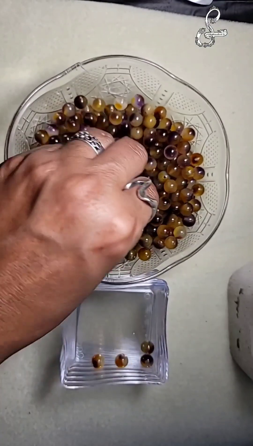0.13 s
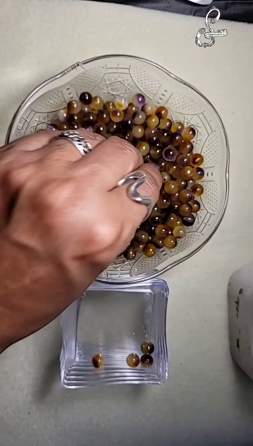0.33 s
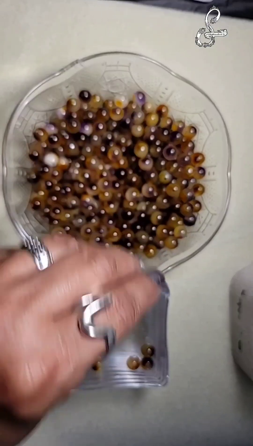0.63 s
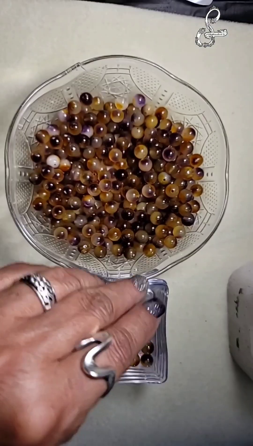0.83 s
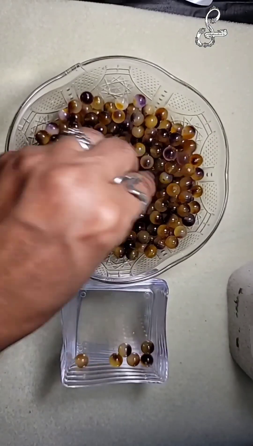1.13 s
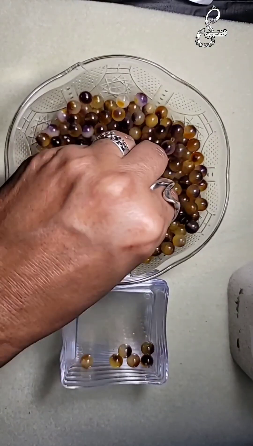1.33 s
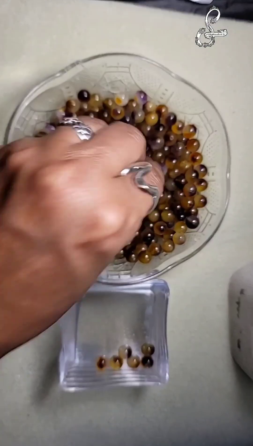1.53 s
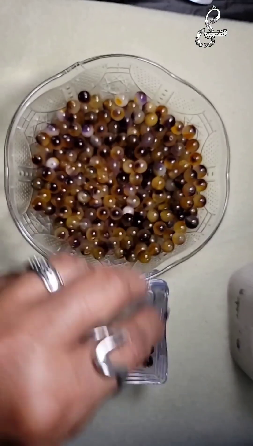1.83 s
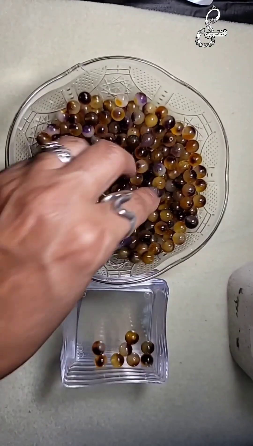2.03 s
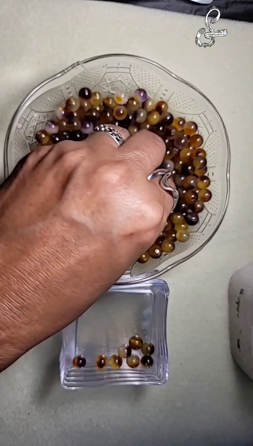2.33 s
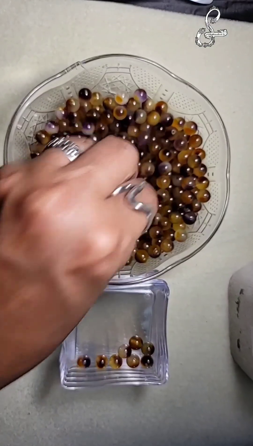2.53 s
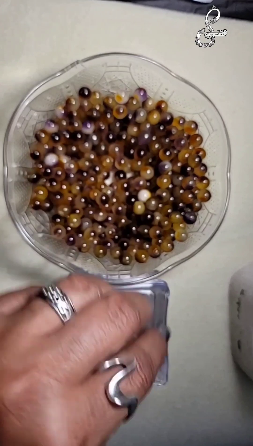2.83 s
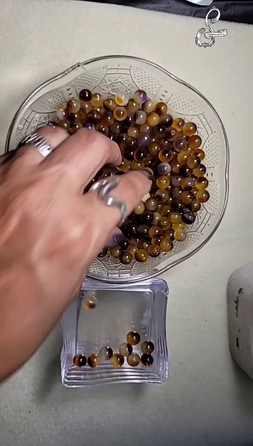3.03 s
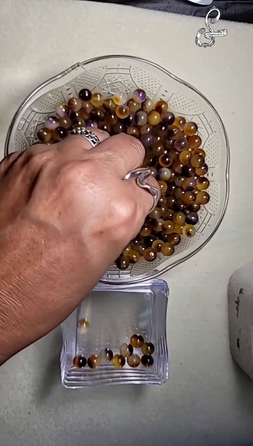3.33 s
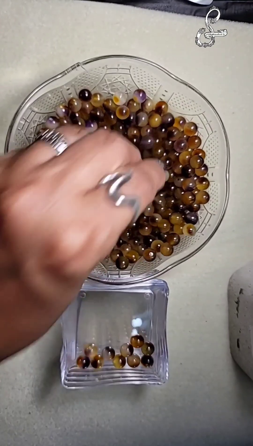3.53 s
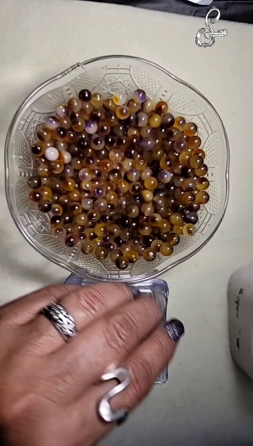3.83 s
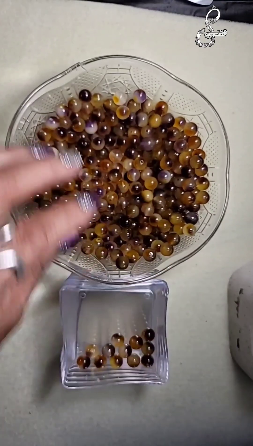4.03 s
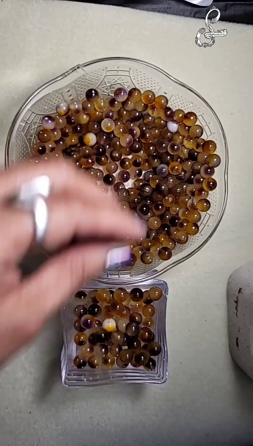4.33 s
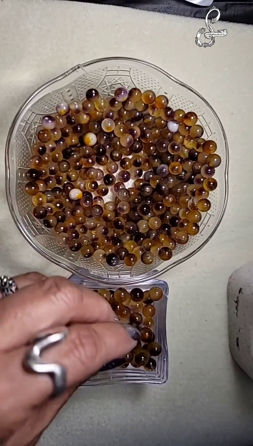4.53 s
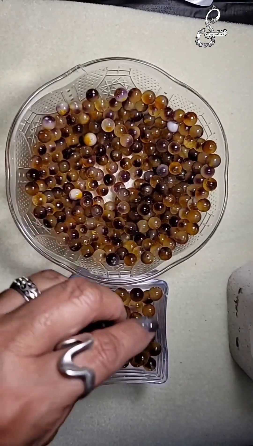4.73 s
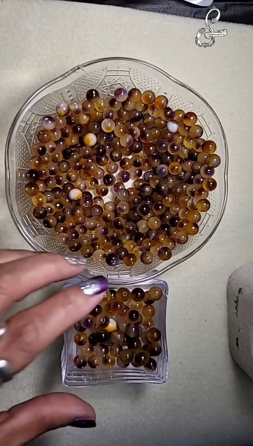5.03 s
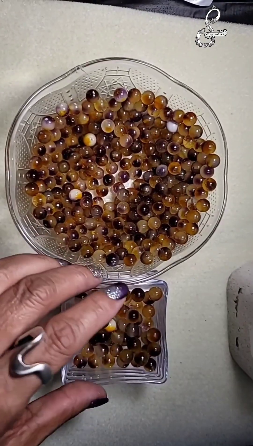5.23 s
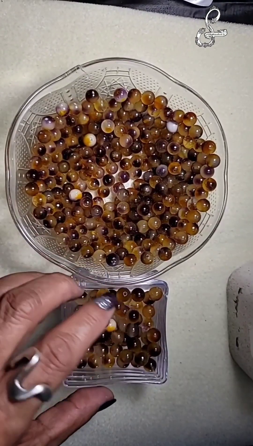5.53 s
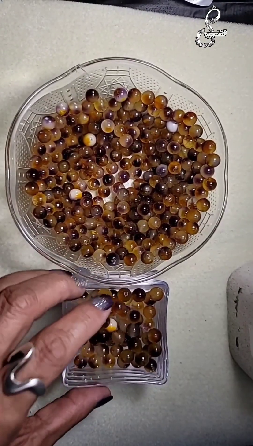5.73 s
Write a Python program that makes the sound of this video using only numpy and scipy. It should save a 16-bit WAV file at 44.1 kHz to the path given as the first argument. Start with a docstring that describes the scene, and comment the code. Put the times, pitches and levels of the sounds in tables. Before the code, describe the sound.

Close stereo sound in a small room with a faint low appliance hum and soft air. A hand digs into stone beads in a glass bowl with dense dry clatter, then drops a few into a clear plastic box with bright bouncing clicks. This repeats four times, about once a second; the sound then cuts out briefly, fades back, and a few dry clicks of the filled box end it.

```python
"""A low wavering hum over soft rushing air, and at once the dry clacks of small stone beads dug by hand in a glass bowl.
Filtered noise and sines make the hum; noise cracks, short knocks and damped glass modes make the bowl.
Picked beads drop, over and over, into a clear plastic box: each landing and bounce cracks and briefly rings its walls.
Fingers rub in dense noise grains, and later jostle the filled box in dry clicks; a small room answers the beads.
Near the end of the digging and dropping the sound drops out for a moment, then fades back in."""
import sys
import numpy as np
from scipy import signal
from scipy.fft import rfft, irfft, next_fast_len
from scipy.io import wavfile
from scipy.ndimage import map_coordinates

SR = 44100
rng = np.random.default_rng(int(sys.argv[2]) if len(sys.argv) > 2 else 0)


def wav_out(sig):
    """Save sig, one row per channel (or a flat mono array), as 16-bit PCM at SR to the path in sys.argv[1]."""
    wavfile.write(sys.argv[1], SR, np.round(np.clip(np.atleast_2d(sig).T, -1, 1) * 32767).astype(np.int16))


N = 259749  # length in samples


def amp(db):
    """Decibel law: amplitude ratio of a level in dB."""
    return 10 ** (np.asarray(db) / 20)


def unit(x):
    """Normalisation to a root-mean-square value of one."""
    return x / np.sqrt(np.mean(x ** 2) + 1e-20)


def along(points, hz):
    """Interpolation of (f/Hz, value) points on a logarithmic frequency axis."""
    f, value = np.transpose(points)
    return np.interp(np.log(hz + 1), np.log(f + 1), value)


def pan(db):
    """Interaural level difference: left and right gains for left minus right in dB."""
    return amp(np.array([db / 2, -db / 2]).reshape(2, -1))


def wobble(rate):
    """Band-limited fluctuation: a smooth random curve through rate knots a second."""
    knots = rng.standard_normal(int(N * rate / SR) + 4)
    return map_coordinates(knots, [np.arange(N) * rate / SR])


def filtered(x, response):
    """Linear filtering: the spectrum of x times a response of frequency."""
    size = next_fast_len(N + SR // 2)
    hz = np.fft.rfftfreq(size, 1 / SR)
    return irfft(rfft(x, size) * response(hz), size)[..., :N]


def convolve(x, tail):
    """Superposition: x sounded through an impulse response."""
    return signal.fftconvolve(np.atleast_2d(x), np.atleast_2d(tail), axes=1)[:, :N]


def colour(x, points, size=2048):
    """Minimum-phase filtering: a causal filter, folded in the cepstrum, with the given (f/Hz, level/dB) curve."""
    hz = np.fft.rfftfreq(size, 1 / SR)
    cepstrum = irfft(np.log(amp(along(points, hz))))
    cepstrum[1:size // 2] *= 2
    cepstrum[size // 2 + 1:] = 0
    return convolve(x, irfft(np.exp(rfft(cepstrum))))


def place(times, grains):
    """Superposition of events: one grain a row added in at its time."""
    index = np.round(times * SR).astype(int)[:, None] + np.arange(grains.shape[1])
    return np.bincount(index.ravel(), grains.ravel(), N)[:N]


def cracks(times, gains, t60, alike, size=700):
    """Impact noise: a brief decaying stereo burst for each contact, partly different at the two ears."""
    t = np.arange(size) / SR
    fade = gains[:, None] * amp(-60 * t / t60) * (1 - np.exp(-t / 0.0002))
    shared, left, right = rng.standard_normal((len(times), 3, size)).transpose(1, 0, 2)
    alike = np.clip(alike, 0, 1)
    sides = pan(2.7 * rng.standard_normal(len(times)))  # each contact radiates in its own direction
    bursts = np.sqrt(alike) * shared + np.sqrt(1 - alike) * np.array([left, right])
    return np.array([place(times, side[:, None] * fade * burst) for side, burst in zip(sides, bursts)])


def ring(modes, scatter_db=0, detune=0, size=4000):
    """Modal superposition: decaying cosines, optionally scattered in level and pitch, cut off after size samples."""
    t = np.arange(size) / SR
    out = 0
    for hz, db, t60, side in modes:
        phase = 2 * np.pi * hz * (1 + detune * rng.normal()) * t + np.pi * rng.integers(2)
        skew = np.array([[1], [-1]]) * rng.normal() * hz / 3500  # the two ears hear high modes out of step
        decay = amp(db + scatter_db * rng.normal() - 60 * t / t60)
        out = out + pan(side) * decay * np.cos(phase + skew)
    return out


def collisions(flow, rate, crowding, spread_db):
    """Inhomogeneous random process: contacts whose power follows flow, as more and stronger blows."""
    density = rate * (flow / flow.max()) ** np.clip(crowding, .3, 1.5)  # contacts per second
    at = np.flatnonzero(rng.random(N) < density / SR)
    sizes = amp(spread_db * np.clip(rng.standard_normal(len(at)), -2, 2))
    return at / SR, unit(sizes) * flow[at] / np.sqrt(density[at] / rate)


def swells(rows):
    """Gesture envelope: the gain rises, holds and falls along straight lines in dB."""
    SWELL_DB = 23  # height of the rise, and drop over each fall time
    t = np.arange(N) / SR
    out = 0
    for start, rise, hold, fall, db in rows:
        rising = np.maximum(1 - (t - start) / rise, 0)
        falling = np.maximum(t - start - rise - hold, 0) / fall
        out = out + (t >= start) * amp(db - SWELL_DB * (rising + falling))
    return out


# spectral density of the rushing air: (f/Hz, relative level/dB per Hz)
AIR_SPECTRUM = [(12, -46), (20, -38.5), (48, -1.5), (157, -9.5), (254, -12.5), (722, -26.5), (826, -29),
                (996, -27.5), (1270, -41.5), (1450, -32.5), (1570, -34), (2110, -38.5), (2680, -43),
                (6480, -52), (12000, -73), (15600, -106), (22000, -120)]
# left-right correlation of the air: (f/Hz, likeness from 0 to 1)
AIR_LIKENESS = [(60, 0.81), (150, 0.98), (300, 0.85), (800, 0.047), (3000, .1)]
# tones of the hum: (f/Hz, mean amplitude level/dB)
HUM_TONES = [(59.5, -38.5), (120, -47), (150.5, -47), (210, -62.5)]


def background():
    """Broadband flow noise with tones: an electric fan or similar appliance hums over low rushing air."""
    # turning power from mid to side sets the correlation of the two ears
    turn = lambda f: np.arccos(np.clip(along(AIR_LIKENESS, f), -1, 1)) / 2
    response = lambda f: amp(along(AIR_SPECTRUM, f)) * [np.cos(turn(f)), np.sin(turn(f))]
    mid, side = filtered(rng.standard_normal((2, N)), response)
    air = amp(-40) * unit(np.array([mid + side, mid - side]))
    t = np.arange(N) / SR
    hum = 0
    for hz, db in HUM_TONES:
        hum = hum + amp(db + 1.2 * wobble(4.2)) * np.sin(2 * np.pi * hz * t + 0.14 * wobble(4))
    return pan(-.8) * (air + hum)


# the hand digging into the bowl:
# (start t/s, plunge duration/s, push duration/s, lift-off t/s, push level/dB, grip level/dB)
SCOOPS = [(0, 0.0023, 0.003, .004, -27, -52), (.119, .026, 0.092, 0.56, -18.5, -33),
          (1.255, .042, 0.052, 1.74, -17.5, -32), (2.246, .028, 0.079, 2.752, -17.5, -35),
          (3.272, .033, .048, 3.777, -16.5, -35.5)]
# the fingers closing on beads: (start t/s, rise/s, hold/s, fall/s, level/dB)
SQUEEZES = [(.27, 0.039, .04, .3, -27), (1.58, 0.057, 0.068, 0.088, -30), (2.37, .07, .055, .04, -23),
            (3.39, 0.12, .02, 0.049, -25)]


def digging():
    """Force envelope: the hand plunges, pushes, eases exponentially into a grip, squeezes and lifts away."""
    PLUNGE_DB = 20  # rise of the rattle as the fingers enter the heap
    CLOSE_S = .075  # time constant of the easing from push to grip
    LIFT_DB_PER_S = 260  # fall of the rattle as the hand leaves
    t = np.arange(N) / SR
    effort = 0
    for start, plunge, push, lift, push_db, grip_db in SCOOPS:
        entering = np.maximum(1 - (t - start) / plunge, 0)
        pushing = np.exp(-np.maximum(t - start - plunge - push, 0) / CLOSE_S)
        leaving = np.maximum(t - lift, 0)
        db = grip_db + (push_db - grip_db) * pushing - PLUNGE_DB * entering - LIFT_DB_PER_S * leaving
        effort = effort + (t >= start) * amp(db)
    return np.hypot(effort, swells(SQUEEZES))


# colour of the crack of stone on stone: (f/Hz, level/dB)
STONE_COLOUR = [(100, -16.5), (330, -11), (580, -20), (780, -17), (1100, -0.5), (1650, 1.5), (2300, 6.5),
                (4000, 4), (6000, 0.5), (8000, -2.5), (10200, 2), (11300, -6.5)]


def clacks(times, gains, pitch_hz, knock_db, knock_t60, crack_t60, size=500):
    """Damped impact of stone on stone: a sharp crack and a knock of a few cycles from the packed heap."""
    t = np.arange(size) / SR
    swell = (gains * amp(knock_db))[:, None] * (1 - np.exp(-t / 0.00088)) * amp(-60 * t / knock_t60)
    lead = .00005 * rng.standard_normal((len(times), 1))  # seconds: each bead lies nearer one ear
    turns = 2 * np.pi * pitch_hz[:, None]
    knocks = np.array([place(times, swell * np.sin(turns * (t + shift))) for shift in (lead, -lead)])
    return colour(cracks(times, gains, crack_t60, alike=0.062), STONE_COLOUR) + knocks


# the clearest single beads knocking in the bowl:
# (t/s, relative level/dB, knock f/Hz, relative knock-to-crack level/dB)
SINGLE_CLACKS = [(0.0331, -17, 2010, 6.5), (0.3121, -3.5, 1900, -4.5), (0.45, -19.5, 1710, 9),
                 (0.4785, -15, 1810, 6), (0.5754, -6, 1630, 0.5), (0.6474, -10, 1587, 0),
                 (0.7393, -21, 1840, 0.5), (0.7961, -26.5, 1750, -5.5), (0.838, -28, 1500, -14.5),
                 (1.484, -9.5, 1730, -1), (1.5719, -8.5, 1750, 1), (1.6282, -12.5, 1710, 0.5),
                 (1.6527, -13, 1534, 4), (1.6777, -7.5, 1589, 3), (1.7072, -14, 1730, 1.5),
                 (1.7544, -12.5, 1745, 0), (1.7977, -16.5, 1570, 5.5), (1.8384, -12, 1560, -10),
                 (1.8465, -6.5, 1690, 2), (1.8547, -14.5, 1830, 2), (1.889, -11, 1680, 3.5),
                 (1.9104, -14.5, 1900, -5.5), (1.983, -26, 1860, -7), (1.9952, -24.5, 1730, 1),
                 (2.0232, -36, 2040, -1.5), (2.6728, -14, 1710, -7), (2.7031, -8.5, 1657, 3.5),
                 (2.747, -5.5, 1800, 1.5), (2.7704, -25, 1780, 7.5), (2.7952, -17.5, 1690, 2),
                 (2.8285, -37, 1778, -3), (3.695, -11, 1704, -1), (3.7642, -26, 1716, 6),
                 (3.8031, -9.5, 1660, 6.5), (3.8327, -11.5, 1804, 4.5), (3.8747, -23, 1850, 0.5),
                 (3.9, -31, 1930, -4.5)]
# modes of the glass under the heap: (f/Hz, relative level/dB, t60/s, left minus right level/dB)
GLASS_MODES = [(2440, -5, 0.18, 10), (2790, -2, 0.36, 13), (2980, -24.5, 0.45, -16),
               (3550, 4.5, 0.12, 10.5), (4040, -12, .1, -12.5), (4950, -7, .08, 6.5)]
# the laden bowl shuddering on the table: (f/Hz, relative level/dB, t60/s, left minus right level/dB)
SHUDDER_MODES = [(230, -5.5, .05, -1), (287, -3.5, 0.032, 0), (361, -0.5, 0.036, 1)]
# direction of the bowl's clacks: (f/Hz, left minus right level/dB)
BOWL_SIDE = [(300, -3), (900, 6.5), (1500, 9), (2200, 0), (3800, 4.5), (6000, 2.5), (10000, 1)]


def bowl():
    """Granular excitation of damped modes: showers and single clacks feed the glass; the showers shake the bowl."""
    CLUMP_DB, CLUMPS_PER_S = 1.55, 150  # the heap sticks and gives way in little avalanches
    SHUDDER_GROWS = 1.443  # exponent: the bowl shakes mostly under the hardest pushes
    flow = digging() * amp(CLUMP_DB * np.clip(wobble(CLUMPS_PER_S), -2, 2))
    times, gains = collisions(flow, rate=1900, crowding=1.05, spread_db=1.0)
    pitches = 1790 * np.exp(0.1 * rng.standard_normal(len(times)))
    shower = amp(-1.72) * clacks(times, gains, pitches, knock_db=5.0, knock_t60=0.0072, crack_t60=0.01)
    s, db, hz, knock_db = np.transpose(SINGLE_CLACKS)
    singles = amp(-4) * clacks(s, amp(db), hz, knock_db + 11.5, knock_t60=0.0045, crack_t60=0.009)
    beads = shower + singles
    glass = convolve(beads.mean(axis=0), ring(GLASS_MODES))
    shudder = convolve(place(times, gains[:, None] ** SHUDDER_GROWS), ring(SHUDDER_MODES))
    sided = filtered(beads, lambda f: pan(along(BOWL_SIDE, f)))
    return sided + amp(-60) * glass + amp(-23) * shudder


# reverberation of the small room: (f/Hz, t60/s)
ROOM_DECAY = [(300, 0.022), (2000, 0.08), (6000, 0.12), (11000, 0.1)]


def room(x):
    """Diffuse reverberation: the table and near walls answer with a short tail of decaying noise."""
    hz, t, z = signal.stft(rng.standard_normal((2, SR // 3)), SR, nperseg=256)
    decay = amp(-60 * t / along(ROOM_DECAY, hz)[:, None])
    tail = signal.istft(z * decay, SR, nperseg=256)[1]
    tail = np.pad(tail, ((0, 0), (SR // 400, 0)))  # the tail starts 2.5 ms late
    return convolve(x, tail / np.linalg.norm(tail[0]))


def bounces(s, db, count=2):
    """Inelastic rebound: each landing is followed by ever softer bounces after uneven flights."""
    FLIGHT_S, FLIGHT_SCATTER = .05, 0.31  # median flight and its logarithmic spread
    LOSS_DB = 18.5  # loss at each bounce
    flights = FLIGHT_S * np.exp(FLIGHT_SCATTER * rng.standard_normal((len(s), count)))
    times = s[:, None] + np.cumsum(np.pad(flights, ((0, 0), (1, 0))), axis=1)
    return times, db[:, None] - LOSS_DB * np.arange(count + 1)


# beads landing in the nearly empty box: (t/s, relative level/dB, relative ring-to-crack level/dB)
DROPS = [(0.99, -6, 0), (1.023, -10.5, 4), (1.042, -15.5, -3), (1.061, -14, 3.5), (1.142, -22, -6),
         (1.209, -16.5, -7.5), (1.232, -21, 0), (2.08, -10.5, -0.5), (2.087, -9, 3.5), (2.137, -17.5, 1.5),
         (2.147, -10.5, 0.5), (3.077, -6, 0), (3.111, -10, 2.5), (3.135, -19.5, 2), (3.148, -12.5, 2),
         (4.041, -10.5, 4), (4.061, -9, 2.5), (4.088, -13, 3.5), (4.11, -14, 3), (4.154, -18.5, -3),
         (4.167, -22.5, 3), (4.276, -27, -3)]
# wall modes of the plastic box: (mean f/Hz, mean relative level/dB, t60/s, left minus right level/dB)
BOX_MODES = [(1006, -7, 0.052, 8.5), (1090, -7.5, 0.039, 7.5), (1230, -6, 0.034, 1), (1604, -20, 0.079, 17),
             (1997, 3.5, 0.029, -2.5), (2129, -3.5, 0.032, -2.5), (2286, -12, 0.093, -1),
             (2450, -16, 0.034, -3.5), (3600, -10.5, 0.0091, -7), (4440, -8, 0.0088, -7.5),
             (5250, -8, 0.019, -2.5), (7100, -14, .012, 2)]
# colour of the crack of stone on plastic: (f/Hz, level/dB)
PLASTIC_COLOUR = [(100, -14.5), (750, -24.5), (1000, 1), (1500, -4.5), (2200, 10.5), (3500, 3), (5000, 5),
                  (8000, 0.5), (10200, 5.5), (11300, -2)]


def box():
    """Impulsive modal excitation: each landing and bounce cracks on the plastic and rings its walls."""
    s, db, ring_db = np.transpose(DROPS)
    times, levels_db = bounces(s, db)
    times = times.ravel()
    ring_levels_db = (levels_db + ring_db[:, None]).ravel()
    # each blow meets the modes at new strengths, and the load of beads shifts them a little
    rings = np.array([amp(level) * ring(BOX_MODES, scatter_db=2.0, detune=0.012) for level in ring_levels_db])
    walls = np.array([place(times, side) for side in rings.transpose(1, 0, 2)])
    impacts = cracks(times, amp(levels_db.ravel()), t60=0.028, alike=0.3, size=1600)
    return amp(-12) * walls + pan(-3) * amp(-8.0) * colour(impacts, PLASTIC_COLOUR)


# fingertips sliding over beads and plastic: (start t/s, rise/s, hold/s, fall/s, relative level/dB)
RUBS = [(1.08, 0.08, 0.023, 0.071, -39), (1.2, 0.064, .015, 0.018, -39.5), (4.16, 0.085, 0.142, .08, -50.5),
        (5.15, 0.082, .64, .05, -57.5)]
# colour of the rubbing: (f/Hz, relative level/dB)
SKIN_COLOUR = [(300, -25.5), (900, -14), (1500, 1), (2100, -5), (2600, 3), (3300, -17.5), (4300, -15),
               (5000, -6), (6200, -17), (8500, -16.5), (10000, -9.5), (11500, -21.5)]


def rub():
    """Stick-slip friction: skin slips in tiny dense grains, with a tick now and then as a bead gives way."""
    flow = swells(RUBS)
    grains = unit(rng.standard_normal((2, N)) * amp(4.5 * wobble(610))) * flow
    ticks = cracks(*collisions(flow, rate=53, crowding=0.36, spread_db=9.5), t60=.006, alike=.3)
    return amp(7.0) * colour(grains + amp(1.5) * ticks, SKIN_COLOUR)


# beads shifting in the filled box: (start t/s, rise/s, hold/s, fall/s, relative level/dB)
JOSTLES = [(4.435, .06, .008, .01, -26), (4.988, 0.0086, 0.059, .09, -27)]
# dry clicks of beads and nails on the filled box: (t/s, relative level/dB)
TAPS = [(4.4632, -23), (4.4724, -17), (4.4959, -8), (4.9931, -13.5), (4.999, -15.5), (5.0212, -17),
        (5.0394, -16), (5.0488, -17), (5.1329, -15), (5.1424, -36), (5.245, -27.5), (5.2642, -30.5),
        (5.7, -37.5), (5.8038, -37), (5.874, -34)]
# colour of clicks among beads packed in the box: (f/Hz, level/dB)
PACKED_COLOUR = [(100, -19.5), (620, -22.5), (880, 2.5), (1300, 1.5), (1700, 4), (2700, 4.5), (4000, 0.5),
                 (7000, -3), (10200, -2), (11300, -6)]


def filled_box():
    """Mass loading and damping: packed beads still the walls, leaving only dry clicks and a short rattle."""
    s, db = np.transpose(TAPS)
    taps = cracks(s, amp(db), t60=0.016, alike=0.39)
    contacts = collisions(swells(JOSTLES), rate=900, crowding=0.53, spread_db=1.5)
    shifting = cracks(*contacts, t60=0.0059, alike=0.44)
    return pan(-1.4) * colour(amp(-1.5) * taps + amp(8.5) * shifting, PACKED_COLOUR)


def dropout():
    """Amplitude gating: the gain ducks sharply, sinks to near silence, then fades back in linearly."""
    MUTE_S, MUTE_STEP_DB, MUTE_DB_PER_S, MUTE_DB = 4.503, 21.5, 449, -67  # start, first step, further fall, floor
    UNMUTE_S, FADE_IN_S = 4.812, 0.18  # the return and its length
    t = np.arange(N) / SR
    since = np.maximum(t - MUTE_S, 0)
    sinking_db = -MUTE_STEP_DB * np.minimum(since / 0.0041, 1) - MUTE_DB_PER_S * since
    return np.maximum(amp(np.maximum(sinking_db, MUTE_DB)), np.clip((t - UNMUTE_S) / FADE_IN_S, 0, 1))


def scene():
    """Superposition of sources: hum, bowl, box and fingers, with room reverberation on the beads."""
    hum = background()
    beads = bowl() + box() + filled_box()
    return dropout() * (hum + beads + amp(-4.0) * room(beads) + rub())


def record(dry):
    """Soft saturation and band limitation: the highest peaks are rounded and the top treble is cut steeply."""
    CUTOFF_HZ = 11350  # half-power frequency
    rounded = dry / (1 + np.abs(dry / 0.67) ** 4) ** (1 / 4)
    return filtered(rounded, lambda f: 1 / np.sqrt(1 + (f / CUTOFF_HZ) ** 110))


dry = scene()
out = record(dry)
wav_out(out)
```